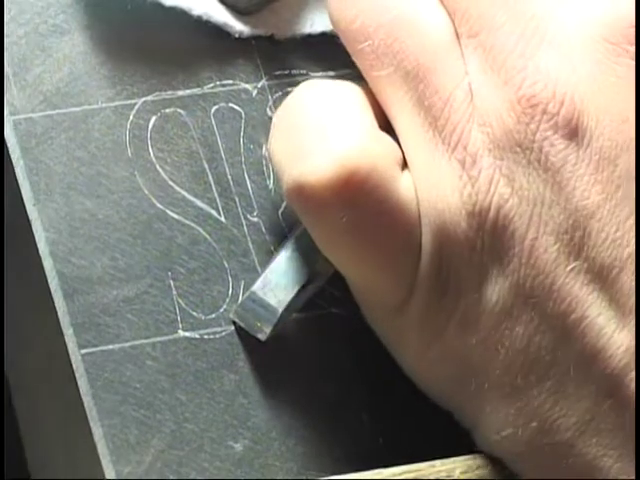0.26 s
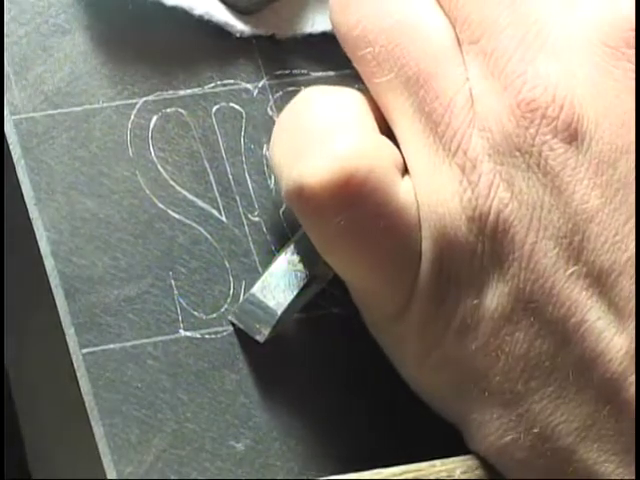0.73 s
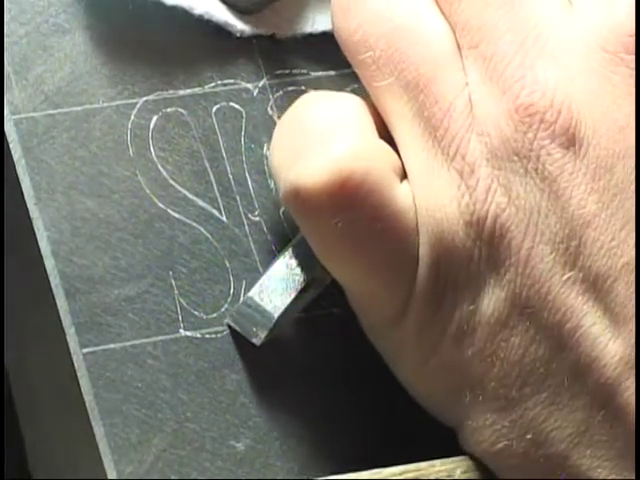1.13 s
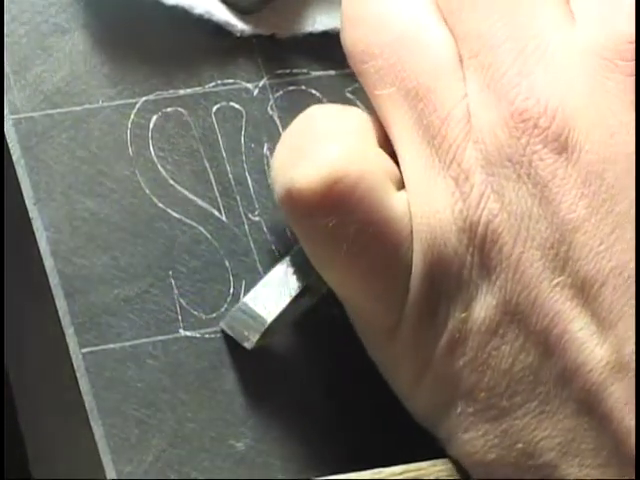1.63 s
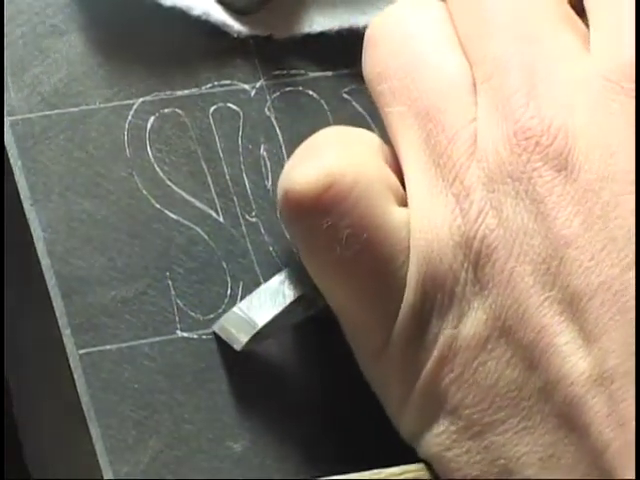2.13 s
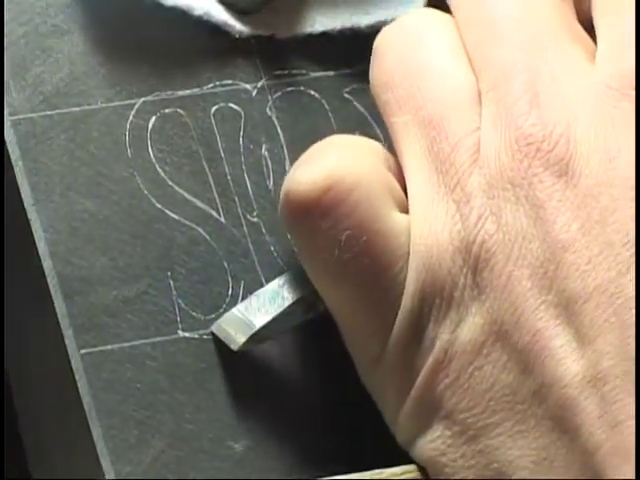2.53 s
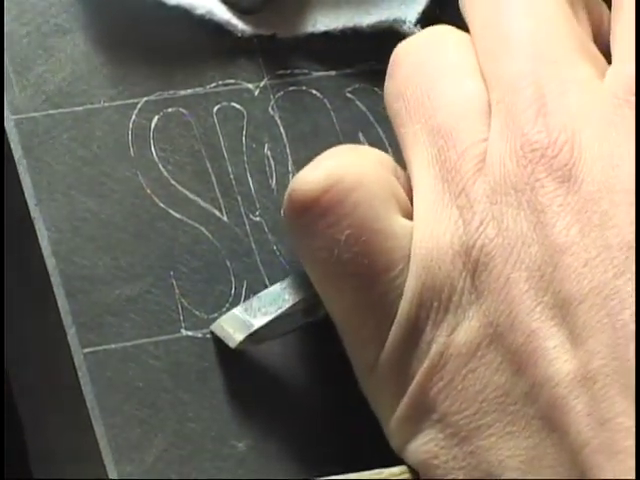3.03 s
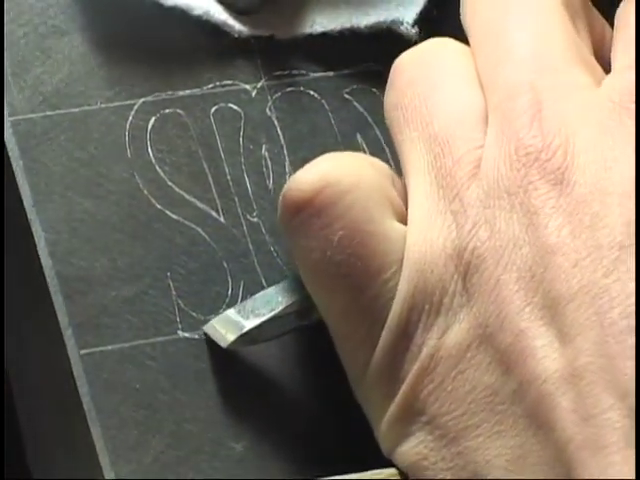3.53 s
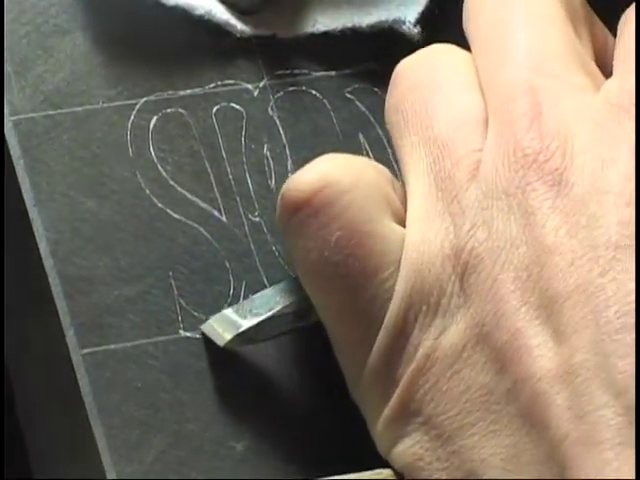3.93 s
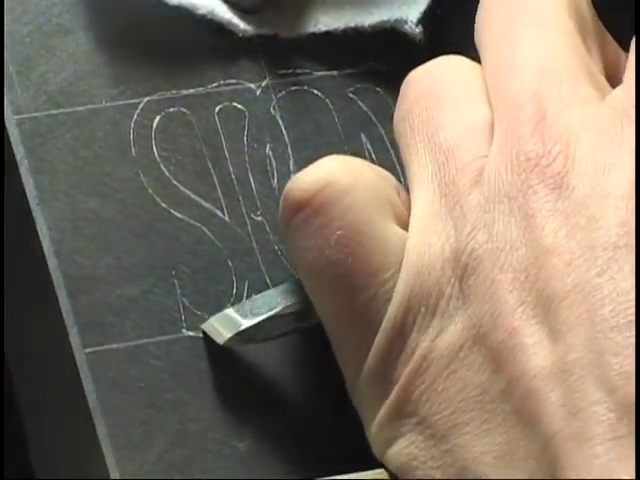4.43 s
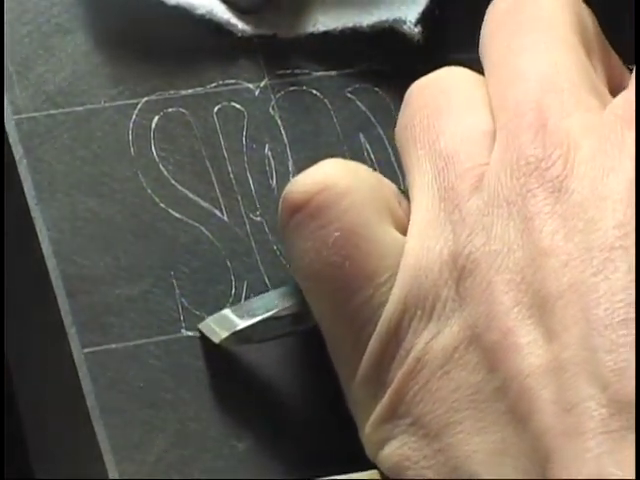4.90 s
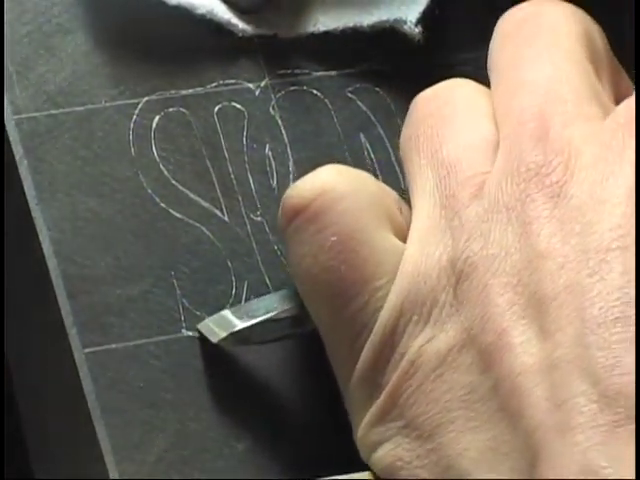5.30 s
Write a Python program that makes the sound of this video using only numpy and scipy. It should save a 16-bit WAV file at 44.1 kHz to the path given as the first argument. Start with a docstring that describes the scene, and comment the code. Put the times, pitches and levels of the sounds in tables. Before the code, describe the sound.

A close, almost mono sound in a small room, with a faint steady hiss throughout. From about 0.1 seconds a hammer taps a steel chisel on a stone slab, evenly, about every 0.2 seconds, until about 5.4 seconds. Each stroke is a very short, hard clack with a few milliseconds of gritty stone crunch, a thin trace of hammer ring, then the slab's hollow mid-pitched ring and low workbench resonance, fading within a fraction of a second into bright early reflections and a short room tail. The first tap is dull; the next ones are crisper, each slightly different. A small chip ticks near 0.3 seconds, with much fainter ones around 3.1 and 4.6. Between roughly 2 and 2.6 seconds the chisel turns and its clack changes tone. Strokes gradually strengthen, with the heaviest bench thump around 4.6 seconds and the hardest blow at 5.0. The last ring fades into hiss.

```python
"""Close, almost mono microphone in a small room: a faint steady hiss lies under everything.
A hammer soon starts tapping a steel chisel about five times a second, cutting a groove in a stone slab.
Each tap is a short clack of decaying steel modes and a noise crunch of stone; modes of the slab and
workbench ring under it, and banded noise answers as the room. A few chips tick between the taps.
About halfway the chisel swings round and its clack changes; late on, the bench thumps heaviest."""
import sys
import numpy as np
from scipy import signal
from scipy.fft import rfft, irfft, next_fast_len
from scipy.io import wavfile

SR = 44100
rng = np.random.default_rng(int(sys.argv[2]) if len(sys.argv) > 2 else 0)


def unload_wav(signal):
    """Save mono or channel-first audio to the path in sys.argv[1] as 16-bit WAV at rate SR, clipped to [-1, 1]."""
    wavfile.write(
        sys.argv[1],
        SR,
        np.round(np.clip(np.atleast_2d(signal).T, -1, 1) * 32767).astype(np.int16),
    )


N = 245190
CUTOFF_HZ = 13000   # top of the microphone chain's range


def from_db(db):
    """Decibels to gain."""
    return 10 ** (np.asarray(db) / 20)


def at_hz(points, hz, column=1):
    """Read one column of a table along log frequency."""
    table = np.array(points)
    return np.interp(np.log(np.maximum(hz, 1)), np.log(table[:, 0]), table[:, column])


def around(hz, centre_hz, octaves):
    """A bell on the pitch axis: 1 at its centre, 0 far away."""
    return np.exp(-(np.log2(hz / centre_hz) / octaves) ** 2)


def coloured(spectrum, shape):
    """Noise of the given spectral shape, scaled to rms 1."""
    hz = np.fft.rfftfreq(shape[-1], 1 / SR)
    white = rfft(rng.standard_normal(shape))
    noise = irfft(white * from_db(at_hz(spectrum, hz)), shape[-1])
    return noise / noise.std()


# how alike diffuse sound is at left and right of the microphone: pitch_hz, likeness (0-1)
LIKENESS = [(50, 0.75), (800, 1), (4000, 0.95), (12000, 0.85)]


def widen(pair):
    """Two unrelated signals become a left and a right that are nearly alike."""
    size = pair.shape[-1]
    alike = at_hz(LIKENESS, np.fft.rfftfreq(size, 1 / SR))
    mid, side = rfft(pair)
    mid = mid * np.sqrt((1 + alike) / 2)
    side = side * np.sqrt((1 - alike) / 2)
    return irfft(np.array([mid + side, mid - side]), size)


# spectral shape of the background: pitch_hz, level_db (per Hz, relative)
FLOOR = [(25, -0.5), (70, 4), (150, -2.5), (280, -1.5), (450, -1.5), (800, -1), (1200, -1), (2000, -10),
         (4000, -13.5), (7000, -18.5), (13000, -25)]
FLOOR_DB = -49   # rms
WHINE_HZ, WHINE_DB = 12100, -100   # rms


def background():
    """Room hush and hiss as steady shaped noise, with a thin electrical whine as a sine."""
    hush = from_db(FLOOR_DB) * widen(coloured(FLOOR, (2, N)))
    whine = np.sqrt(2) * np.sin(2 * np.pi * WHINE_HZ * np.arange(N) / SR)
    return hush + from_db(WHINE_DB) * whine


def ring(t, hz, t60):
    """A struck mode: a sine whose height starts at 1 and falls 60 dB in t60 seconds."""
    t = np.maximum(t, 0)
    return np.sin(2 * np.pi * hz * t) * from_db(-60 * t / t60)


def lay_at(sounds, times):
    """Lay one sound at each time."""
    out = np.zeros(N + SR)
    for sound, start_s in zip(sounds, times):
        start = round(start_s * SR)
        out[start:start + len(sound)] += sound
    return out[:N]


def two_draws():
    """Two columns of random numbers, one row a tap."""
    return rng.standard_normal((len(TAPS), 2)).T[:, :, None]


# level of the bench's thump as the cut moves on: start_s, level_db
THUMP = [(0.1, -3.5), (0.9, 0), (1.5, -1.5), (2.8, -2), (3.7, 1), (4.6, 7), (5.5, 2.5)]
THUMP_HZ, THUMP_OCTAVES = 270, 0.73   # centre and reach of the thump
# a firm bite drives the slab's lowest bending modes: centre and reach
BITE_HZ, BITE_OCTAVES = 674, 0.24
# a stronger tap passes wholly into the steel, above STEEL_HZ, and only in part into the heavy stone below
STEEL_HZ, STONE_FOLLOWS = 1340, 0.18
CLACK_HZ = 3000   # centre of the clack; a hard contact brightens everything above
# hammer taps: start_s, force_db, bite_db (how firmly the edge seats and bends the slab),
# hardness_db_per_octave (of the contact)
TAPS = [(0.0803, -4.5, -1, -22), (0.2789, -3.5, 4, -4), (0.4634, -3, 1.5, -4.5), (0.6644, -3.5, -1, -1.5),
        (0.864, -1.5, 3, -3), (1.051, -2, 0.5, -2), (1.2438, -2, -3.5, -7), (1.439, -3, -5, 1),
        (1.6346, -0.5, 1, -5), (1.827, -.5, -1, -6), (2.0196, -1.5, 0.5, -5), (2.1986, -0.5, -3.5, -7.5),
        (2.4021, -0.5, -3.5, 1.5), (2.5962, 3, 2.5, 0), (2.7896, -1, 5.5, 1.5), (2.988, -1.5, 7, 2.5),
        (3.1908, -1, -3, -1), (3.3842, 1.5, 0, 0), (3.5869, 1.5, -4.5, 1.5), (3.7842, 1, -4.5, 1.5),
        (3.9889, 2.5, 5, 0.5), (4.1974, 1.5, 1, 1), (4.4004, 2, -3.5, -1.5), (4.5969, 3, -7, -2),
        (4.798, 3.5, -0.5, -0.5), (5.0027, 6, -2.5, -5), (5.2075, 2.5, -5, -2), (5.4062, 2.5, -3.5, -2)]
START_S, FORCE_DB, BITE_DB, HARDNESS = np.transpose(TAPS)[:, :, None]
TAP_TIMES = START_S[:, 0]


def strength(hz):
    """How hard each tap drives a frequency through force, hardness, bite and thump; one row a tap."""
    steel = 1 / (1 + (STEEL_HZ / hz) ** 8)
    force = FORCE_DB * (steel + STONE_FOLLOWS * (1 - steel))
    brightness = HARDNESS * max(0, np.log2(hz / CLACK_HZ))
    bite = BITE_DB * around(hz, BITE_HZ, BITE_OCTAVES)
    thump = np.interp(START_S, *np.transpose(THUMP)) * around(hz, THUMP_HZ, THUMP_OCTAVES)
    return from_db(force + brightness + bite + thump)


# the chisel swings round as it follows the curved groove: start_s, turn (0-1)
TURN = [(0, 0.15), (1.2, 0), (2.0, 0.04), (2.6, 0.9), (3.5, 0.87), (4.3, 0.94), (5.5, 0.88)]
# modes of the hand-damped chisel on the stone, before and after its turn:
# pitch_before_hz, pitch_after_hz, level_before_db, level_after_db, t60_s
CHISEL = [(1171, 1250, -25.5, -22, 0.045), (1488, 1504, -35.5, -25, 0.073),
          (1830, 1613, -32, -13.5, 0.0023), (1857, 2000, -24.5, -27, 0.017),
          (2180, 2180, -18.5, -14, 0.0028), (2655, 2780, -28, -21, 0.022), (3244, 3170, -23.5, -24, 0.012),
          (4120, 3560, -19.5, -40, 0.0096), (4870, 4410, -18, -22, 0.0077),
          (5254, 4830, -18.5, -19, 0.0038), (5430, 6300, -74, -29, 0.0054),
          (8760, 9350, -37.5, -39.5, 0.0096)]


def chisel(t, detune, scatter_db):
    """The steel clack; its modes slide in pitch and balance as the tool turns."""
    turn = np.interp(START_S, *np.transpose(TURN))
    out = 0
    for k, (hz_before, hz_after, db_before, db_after, t60) in enumerate(CHISEL):
        pitch, share = two_draws()
        hz = (hz_before + turn * (hz_after - hz_before)) * (1 + detune * pitch)
        db = db_before + turn * (db_after - db_before) + scatter_db * share
        # the two lowest swing together, higher neighbours oppose
        polarity = (-1) ** max(k - 1, 0)
        out = out + polarity * strength(hz_after) * from_db(db) * ring(t, hz, t60)
    return out


# modes of the hammer head: pitch_hz, level_db, t60_s
HAMMER = [(2500, -44, 0.076), (4300, -43.5, 0.09)]
# the head's ring: dB per dB of force, and its spread from tap to tap
HAMMER_FOLLOWS, HAMMER_SCATTER_DB = 1.5, 5.5


def hammer(t, detune):
    """The head's modes ring on after the blow, more after a strong one, with scatter from tap to tap."""
    pitch, off_centre = two_draws()
    ring_db = HAMMER_FOLLOWS * FORCE_DB + HAMMER_SCATTER_DB * off_centre
    return sum(from_db(db + ring_db) * ring(t, hz * (1 + detune * pitch), t60) for hz, db, t60 in HAMMER)


def thin(steel, cut_hz):
    """A slim bar radiates little bass."""
    return signal.sosfilt(signal.butter(1, cut_hz, "high", fs=SR, output="sos"), steel)


# spectral shape of stone crushed under the edge: pitch_hz, level_db (per Hz, relative)
CRUNCH = [(200, -37), (900, -21), (1500, 23), (3000, 15), (5000, -16), (6200, 1), (8000, -14), (10000, -13),
          (13000, -69)]


def crunch(t, level_db, t60, rise_s):
    """The edge crushes stone for a few milliseconds: a noise burst with a fast rise and decay."""
    burst = (1 - np.exp(-t / rise_s)) * from_db(-60 * t / t60)
    grit = coloured(CRUNCH, (len(TAPS), len(t)))
    return from_db(level_db) * strength(CLACK_HZ) * burst * grit


def struck(t, modes, lag_s, detune, scatter_db):
    """A body's modes for every tap; the contact point changes their pitch and share a little."""
    out = 0
    for hz, db, t60 in modes:
        pitch, share = two_draws()
        height = strength(hz) * from_db(db + scatter_db * share)
        arrival = lag_s * np.sqrt(1000 / hz)   # low bending waves travel more slowly
        out = out + height * ring(t - arrival, hz * (1 + detune * pitch), t60)
    return out


# modes of the stone slab: pitch_hz, level_db, t60_s
SLAB = [(587, -49, 0.48), (611.8, -29.5, 0.2), (625, -41.5, 0.38), (635.3, -36.5, 0.4), (696, -48, 0.62),
        (844, -24.5, 0.23), (895, -35.5, 0.3), (930, -45.5, 0.53), (1030, -45.5, 0.3), (1048, -42.5, 0.32),
        (1096, -36.5, 0.2), (1165, -53, 0.61), (1183, -48, 0.53)]


def slab(t):
    """The stone rings in bending modes just after the steel speaks."""
    return struck(t, SLAB, lag_s=0.001453, detune=0.002, scatter_db=2.53)


# modes of the workbench: pitch_hz, level_db, t60_s
BENCH = [(79, -38, 0.035), (123, -38.5, 0.041), (179.4, -39, 0.061), (228.6, -41, 0.23), (252.2, -46, 0.58),
         (266.2, -39, 0.3), (309.8, -42.5, 0.25), (404, -57.5, 0.32)]


def bench(t):
    """The workbench rings in low modes under the slab."""
    return struck(t, BENCH, lag_s=0.001, detune=0.005, scatter_db=0.5)


# the room's answer to a tap: pitch_hz, level_db (per Hz, relative), t60_s
ROOM = [(50, -13, 1), (250, -8.5, 0.45), (530, -3.5, 0.27), (556, -2, 0.4), (950, 3, 0.39), (1030, 6, 0.23),
        (1860, -13.5, 0.39), (3020, -16.5, 0.4), (5070, -21, 0.31), (6500, -41, 0.42), (12000, -50, .1)]


def reflections(size, same):
    """Diffuse sound; part of it returns alike after every tap, since the walls stay put."""
    now = np.arange(size)
    starts = np.round(TAP_TIMES * SR).astype(int)
    latest = np.maximum(np.searchsorted(starts, now, "right") - 1, 0)
    since_tap = now - starts[latest]
    fresh = coloured(ROOM, (2, size))
    repeated = coloured(ROOM, (2, size))[:, since_tap]
    return np.sqrt(1 - same) * fresh + np.sqrt(same) * repeated


def room(t, level_db, onset_s, early_db, early_t60, early_hz, patchy_db):
    """Bright early reflections off the bench top, then a diffuse tail with its own decay in each band."""
    size = next_fast_len(N)
    hz = np.fft.rfftfreq(size, 1 / SR)
    diffuse = rfft(widen(reflections(size, same=0.37)))
    edges = np.geomspace(100, CUTOFF_HZ, 19)
    out = 0
    for low, high in zip(edges, edges[1:]):
        centre = np.sqrt(low * high)
        brightness = centre ** 2 / (centre ** 2 + early_hz ** 2)
        early = from_db(early_db - 60 * t / early_t60) * brightness
        late = from_db(-60 * t / at_hz(ROOM, centre, column=2))
        drive = strength(centre) * from_db(patchy_db * rng.standard_normal((len(TAPS), 1)))
        envelope = drive * (early + late) * (1 - np.exp(-(t / onset_s) ** 2))
        band = irfft(diffuse * ((hz >= low) & (hz < high)), size)[:, :N]
        out = out + band * np.sqrt(lay_at(envelope ** 2, TAP_TIMES))   # overlapping tails add in power
    return from_db(level_db) * out


# loose chips of stone landing: start_s, level_db, pitch_hz, t60_s
CHIPS = [(0.338, -34, 1590, 0.012), (3.105, -43, 1680, .03), (4.618, -44, 9600, .012)]


def chips(t):
    """Small flakes tick once as they land, each a single quickly fading mode."""
    ticks = [from_db(db) * ring(t, hz, t60) for _, db, hz, t60 in CHIPS]
    return lay_at(ticks, [row[0] for row in CHIPS])


def scene():
    """Steel speaks first, the slab follows, and the room answers over the hush."""
    t = np.arange(SR // 3) / SR
    steel = chisel(t, detune=0.017, scatter_db=2.14) + hammer(t, detune=0.0056)
    stone = slab(t) + crunch(t, level_db=-24.5, t60=0.02, rise_s=0.00092)
    taps = lay_at(thin(steel, cut_hz=460) + stone + bench(t), TAP_TIMES)
    echoes = room(t, level_db=-30.0, onset_s=0.00066, early_db=14.5, early_t60=0.019,
                  early_hz=2200, patchy_db=0.76)
    return taps + echoes + chips(t) + background()


def record(dry, low_cut_hz=34):
    """The deepest bass is thinned out, and the microphone chain cuts the top steeply."""
    thinned = signal.sosfilt(signal.butter(2, low_cut_hz, "high", fs=SR, output="sos"), dry)
    return signal.sosfilt(signal.ellip(10, .2, 70, CUTOFF_HZ, fs=SR, output="sos"), thinned)


dry = scene()
out = record(dry)
unload_wav(out)
```